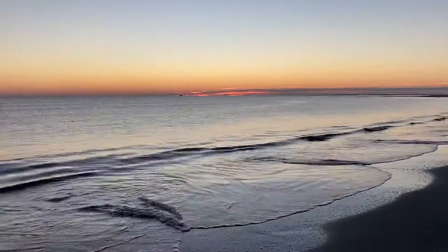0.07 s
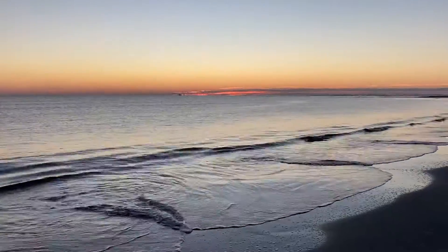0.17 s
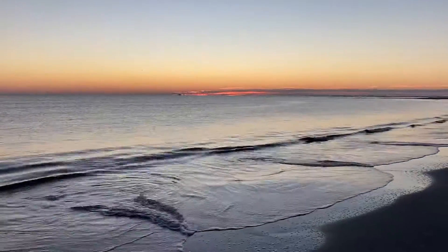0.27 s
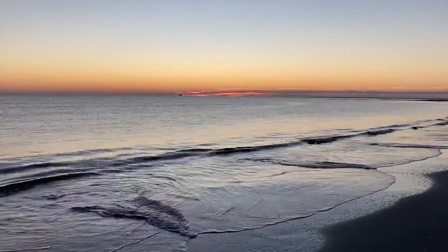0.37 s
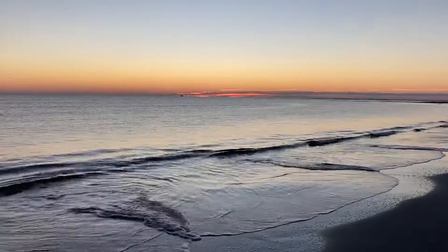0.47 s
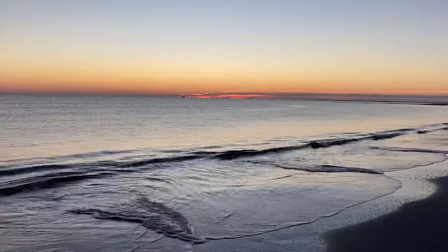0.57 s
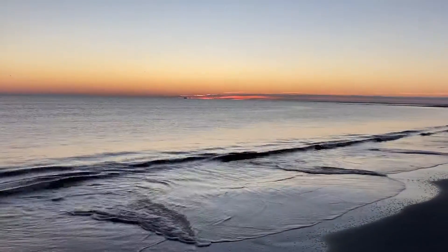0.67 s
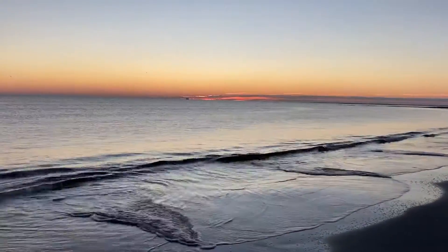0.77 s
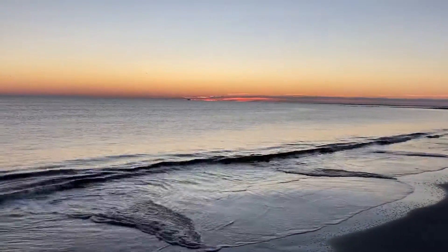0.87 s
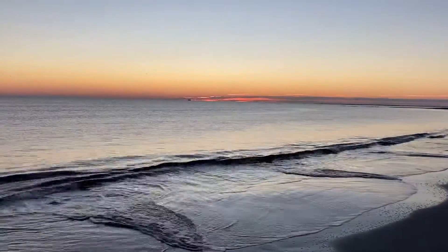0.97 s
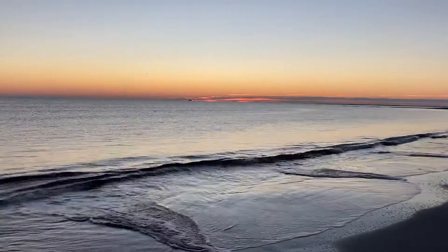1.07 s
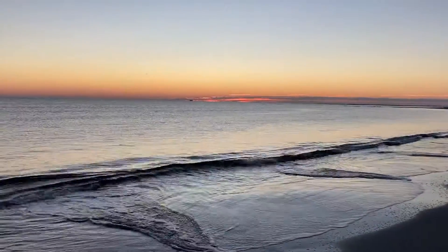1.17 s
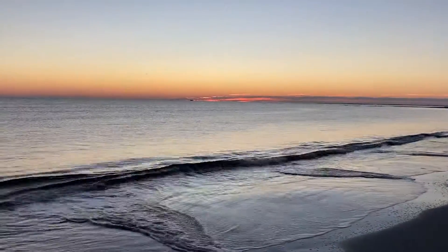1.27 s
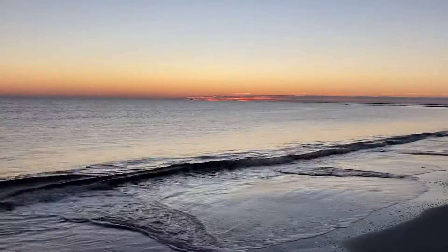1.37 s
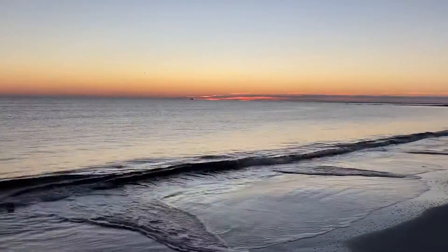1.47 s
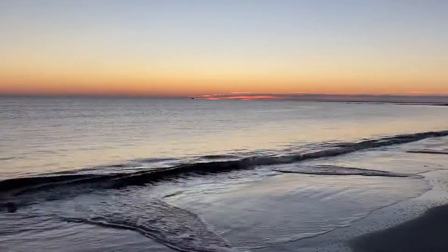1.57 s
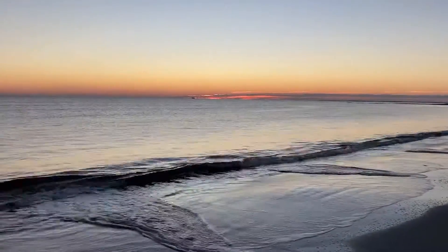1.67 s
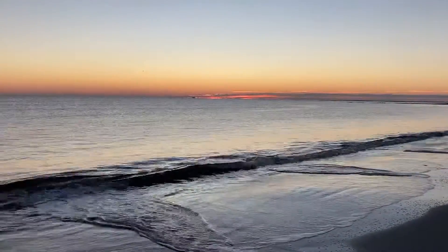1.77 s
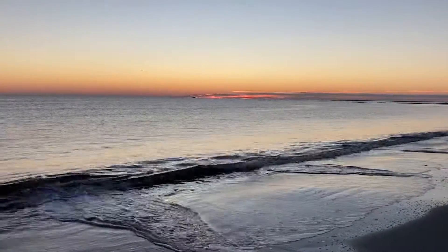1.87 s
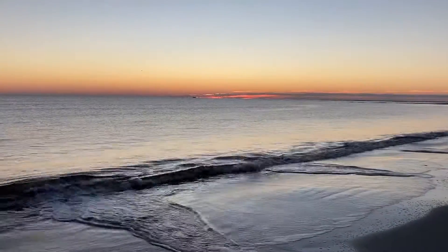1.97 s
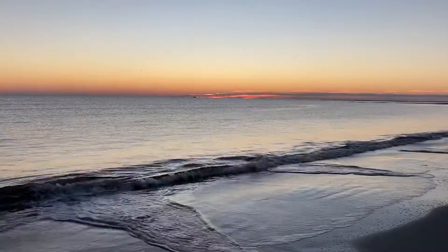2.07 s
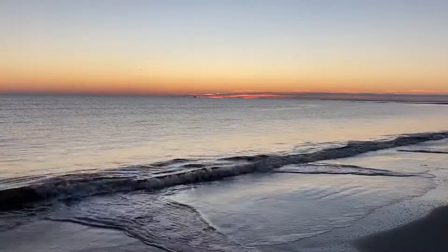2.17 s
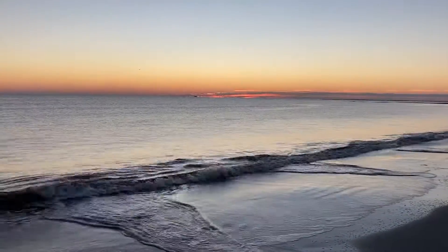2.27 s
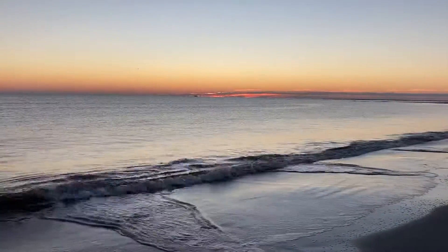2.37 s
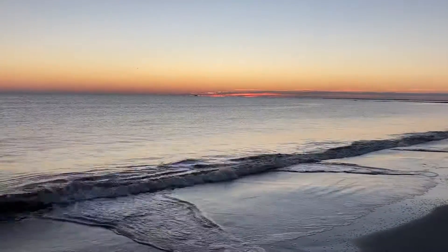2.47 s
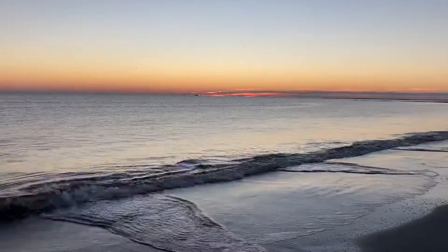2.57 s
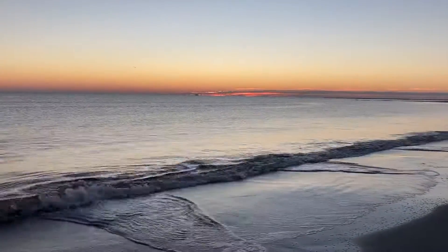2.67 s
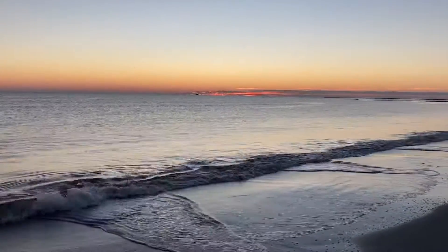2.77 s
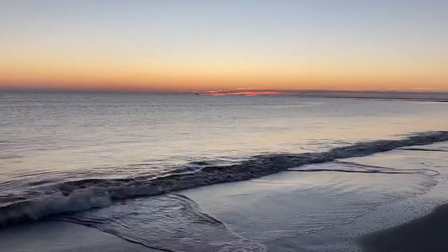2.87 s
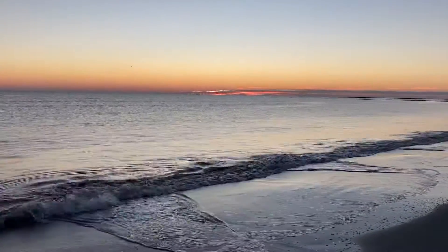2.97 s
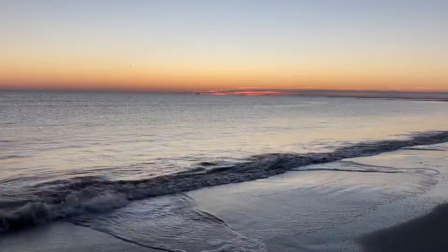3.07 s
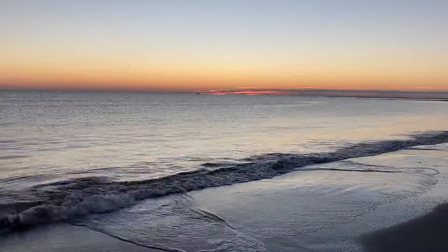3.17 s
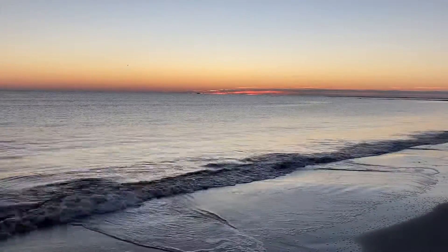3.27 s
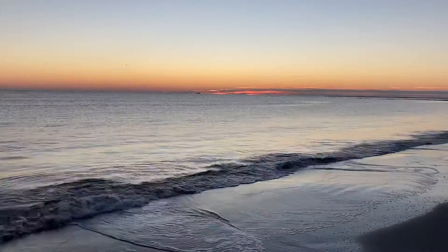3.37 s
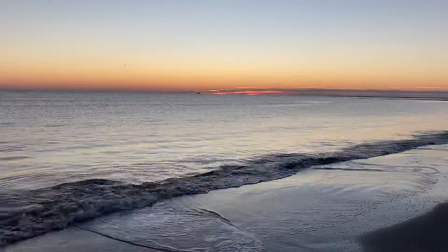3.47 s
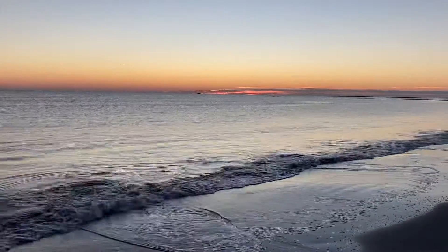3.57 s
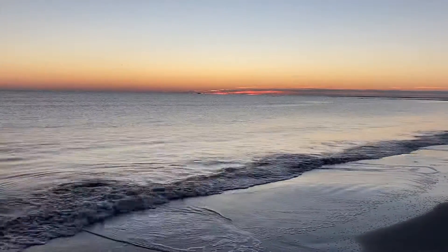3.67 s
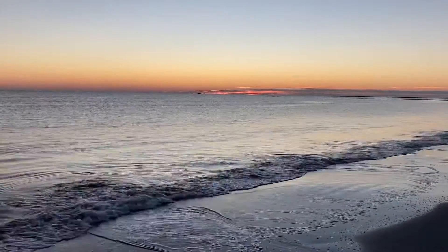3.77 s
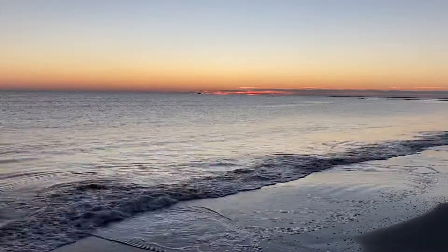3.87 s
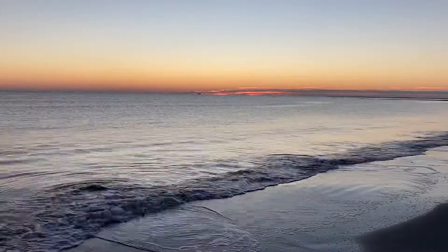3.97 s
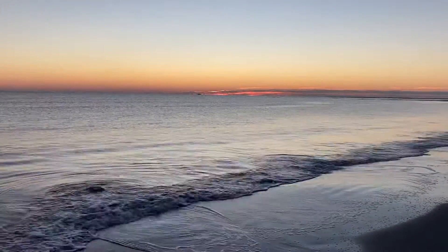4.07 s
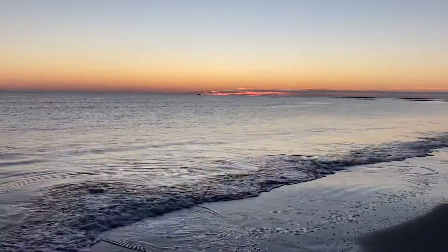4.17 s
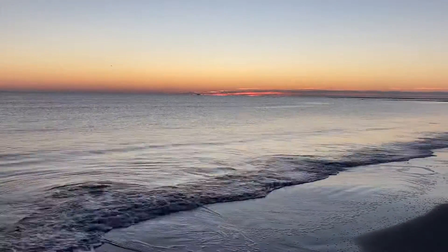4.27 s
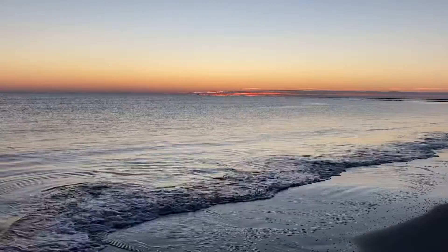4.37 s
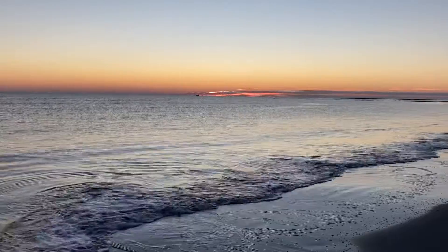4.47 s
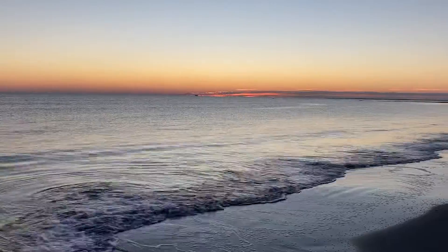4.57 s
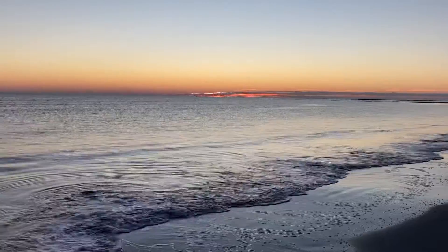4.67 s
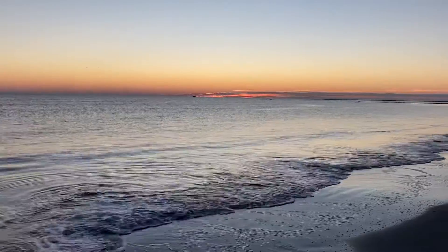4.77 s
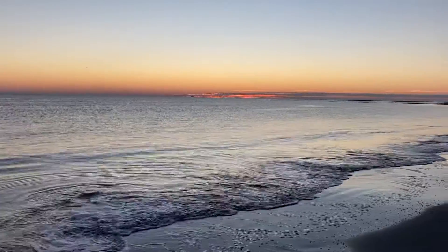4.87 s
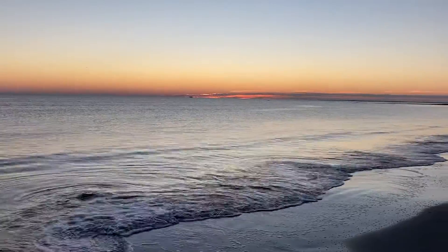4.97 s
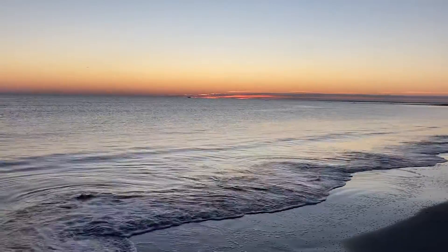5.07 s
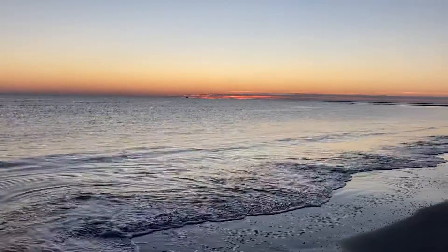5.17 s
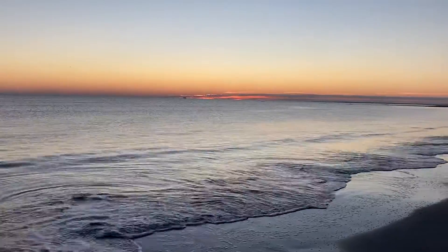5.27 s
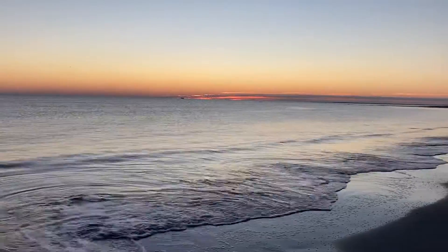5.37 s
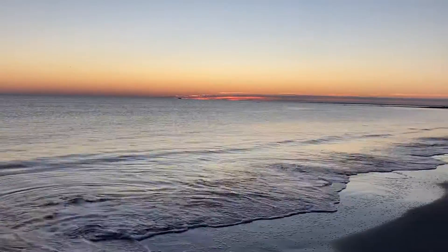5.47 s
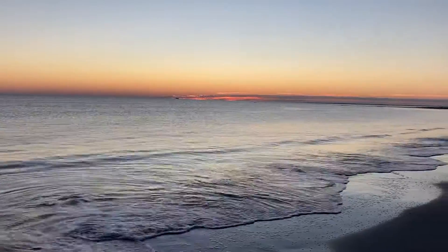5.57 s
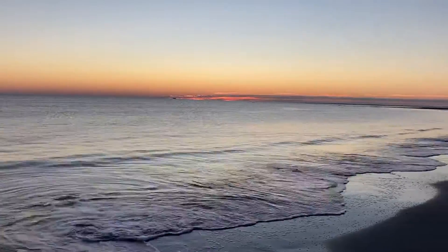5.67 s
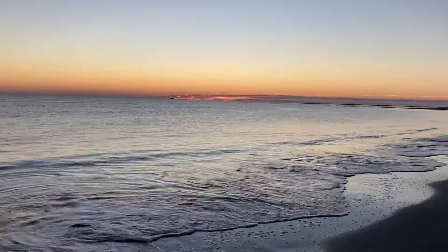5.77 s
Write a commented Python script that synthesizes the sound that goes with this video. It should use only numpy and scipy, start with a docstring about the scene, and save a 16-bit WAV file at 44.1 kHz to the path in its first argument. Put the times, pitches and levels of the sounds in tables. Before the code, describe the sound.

Quiet ripples and distant surf come first, with wind nudging the microphone. A small breaker builds, slapping and gulping as it crosses right to left, bursts into splashy wash, then sinks into fine bubbling fizz on sand. Wind flutters grow strongest around five seconds, followed by a brief faint shorebird twitter at left. Dry outdoor space, no echo.

```python
"""A small wave breaks along a sandy beach, right to left, and runs up the sand as fizzing foam.
Water is shaped noise plus clouds of damped bubble tones; trapped air gulps as rising tones, foam spits.
Wind buffets the two microphone ports as low noise and single pressure swings.
A fuzzy low hum, a thin hiss and far surf lie underneath as a modulated tone and shaped noise.
Two sharp ticks (snap and damped tones) sound close by; a distant shorebird's glides twitter near the end."""
import sys
import numpy as np
from scipy import signal
from scipy.fft import rfft, irfft, next_fast_len
from scipy.io import wavfile
from scipy.ndimage import uniform_filter1d, map_coordinates

SR = 44100
rng = np.random.default_rng(int(sys.argv[2]) if len(sys.argv) > 2 else 0)


def log_audio(samples):
    """Write samples as a 16-bit WAV file to the path given in sys.argv[1]."""
    # one column per channel
    frames = np.atleast_2d(samples).T
    # limit to full scale, then quantise
    limited = np.clip(frames, -1, 1)
    pcm = np.round(limited * 32767).astype(np.int16)
    wavfile.write(sys.argv[1], SR, pcm)


N = 257191  # samples

TOP_HZ = 15800  # band limit
BREAK_S, COLLAPSE_S = 2.526, 2.896  # whole crest breaking between these times

# All spectra give relative gain; the level is set where they are used.
# steady high hiss: freq_hz, gain_db
HISS_SPECTRUM = [(4000, -19), (6000, -3), (7500, -9), (11500, -2.5), (13000, -5), (15500, -8)]
# low drone, relative level: time_s, level_db
HUM_LEVEL = [(0, -46.5), (3, -45), (4, -48), (5.2, -47.5), (5.83, -48.5)]
# surf far along the beach: freq_hz, gain_db
FAR_SURF_SPECTRUM = [(60, -7), (160, -3), (220, 11), (320, 6.5), (480, 7), (660, -9), (1400, -12),
                     (2300, -16), (3500, -11), (6000, -44), (10000, -51), (15500, -36)]
# wind rumble: freq_hz, gain_db
RUMBLE_SPECTRUM = [(15, -17), (30, -14), (45, -3.5), (62, 1.5), (100, -1.5), (160, -6.5), (250, -13),
                   (500, -22), (1200, -91)]
# gusts over the breeze, relative level: middle_s, length_s, level_db
GUSTS = [(1.302, 0.74, -49), (2.393, 1.04, -42), (2.998, 0.15, -40), (4.2, 0.85, -60), (5.827, 0.14, -46)]
# single eddies hitting the ports: middle_s, peak_db, swing_hz, length_s
EDDIES = [(0.243, -30.5, 55, .044), (.77, -37.5, 70, .04), (1.145, -35, 80, .06), (1.428, -27.5, 120, .04),
          (1.535, -34.5, 68, .05), (2.161, -30, 82, .048), (2.485, -27, 65, .06), (3.169, -28, 90, .04),
          (3.441, -31, 70, .048), (3.55, -36, 55, .05), (3.96, -35, 50, .048), (4.185, -31, 190, .014),
          (4.29, -38, 50, .05), (4.44, -38, 50, .05), (4.468, -35, 140, .03), (4.635, -30.5, 120, .035),
          (4.669, -28, 55, .048), (4.727, -30.5, 105, .045), (4.756, -30, 75, .045), (4.832, -33, 100, .04),
          (4.868, -33.5, 58, .05), (4.912, -31.5, 52, .055), (4.979, -24, 52, .042), (5.064, -24, 65, .036),
          (5.09, -23.5, 92, .036), (5.361, -37, 102, .048), (5.42, -36, 95, .04), (5.452, -29.5, 135, .035),
          (5.48, -30, 66, .048), (5.62, -38, 70, .05), (5.728, -29, 80, .036), (5.8, -34, 65, .07)]
# turbulence stirred by eddies: freq_hz, gain_db
TURBULENCE_SPECTRUM = [(40, -20), (90, 3), (150, 5), (260, -14.5), (400, -24), (900, -60)]
# bird syllables, four low, then fainter high ones between and after: start_s, length_s, pitch_hz,
# glide_hz_per_s, level_db
BIRD_SYLLABLES = [(5.226, .036, 2585, 2200, -45), (5.27, .025, 2625, -500, -43.5),
                  (5.302, .027, 2635, -2000, -44), (5.341, .02, 2580, -4500, -44.5),
                  (5.258, .02, 3660, -6000, -58), (5.297, .012, 3540, -2000, -55),
                  (5.333, .012, 3450, -6000, -54), (5.364, .026, 3400, 1500, -55),
                  (5.384, .03, 3450, -6000, -59)]
# sharp ticks: start_s, snap_db, body_db
TICKS = [(.8368, -32.5, -50), (4.3517, -43, -21)]
# damped tones of a tick body: freq_hz, level_db, t60_s
TICK_MODES = [(800, -.5, .006), (2300, 4, .0033), (4400, 0, .003), (8400, 1, .0035)]

# where the water is loudest: time_s, left_share (0-1 of power)
SWEEP = [(0, 0.02), (.9, 0), (1.3, 0.14), (2.2, 0.96), (3.2, 0.99), (4.2, 0.61), (5.8, 1)]
# sound bending round to the ports from the left: freq_hz, left_lead_rad, left_louder_db
FROM_LEFT = [(100, .1, -2), (202, 0.1, -1.5), (374, 1.22, -0.5), (700, 1.62, 4), (1246, 1.93, 5),
             (1380, 3.76, 0), (1830, 4.32, 0.5), (2310, 5.8, 0.5), (2750, 6.8, 4), (3750, 10.2, -1),
             (4580, 12.2, -2), (6200, 15.2, -4.5)]
# the same from the right: freq_hz, left_lead_rad, left_louder_db
FROM_RIGHT = [(100, 0.5, 9), (290, 0.15, -4.5), (550, 0.5, -1), (1090, -1, -0.5), (1510, 1.1, 0),
              (1780, -2.5, 2), (2600, 5.5, 2), (4500, 3, -20), (5970, -6, -2)]
# left-right phase turn that widens the treble: freq_hz, left_lead_rad
TREBLE_PHASE_TURN = [(5200, 3.1), (7200, 0), (9100, -3.1), (11300, -6.3), (13700, -9.4), (15600, -12.6)]
# colour of the right stretch against the left: freq_hz, gain_db
RIGHT_STRETCH_COLOUR = [(100, -15), (200, 6.5), (330, 2.5), (480, 4), (750, 0), (1030, 5), (1300, 1),
                        (1550, 8), (2150, 2), (2600, -40), (3600, -42), (4600, -15), (6000, -1.5)]
# breaking crest: freq_hz, gain_db
ROAR_SPECTRUM = [(50, -26), (100, 0), (160, 1), (280, -2), (430, -1.5), (620, 3), (820, -4), (1050, -18),
                 (1500, -15), (3000, -21), (6000, -67)]
# white water on the sand: freq_hz, gain_db
WASH_SPECTRUM = [(300, -10), (700, 1.5), (1080, 4), (1380, 0.5), (1650, 1), (2200, 0.5), (2700, -3.5),
                 (3400, -6.5), (4500, -16), (6000, -9), (10000, -49)]
# foam fizz: freq_hz, gain_db
FIZZ_SPECTRUM = [(2000, 11.5), (3500, 8.5), (5000, 8), (6200, -2.5), (7500, -2.5), (9000, -9), (11000, -4),
                 (12500, -9.5), (15500, -14.5)]
# thin sheet of water: freq_hz, gain_db
RUSTLE_SPECTRUM = [(2000, -17), (3500, 5.5), (4700, 15), (6000, 8), (7500, 10), (12000, -107)]
# falling spray: freq_hz, gain_db
SPRAY_SPECTRUM = [(1200, -13), (2200, 3.5), (2800, 0.5), (3500, 0.5), (4500, -4.5), (5600, -11.5),
                  (7500, -40), (12000, -117)]
# deep plunge: freq_hz, gain_db
DEEP_SPECTRUM = [(50, -39), (110, -4.5), (170, -2.5), (290, 1.5), (430, -3), (620, -6.5), (900, -8.5),
                 (2000, -68)]
# foam left on the sand: freq_hz, gain_db
LATHER_SPECTRUM = [(1000, -16), (1600, 4), (2400, 4), (2800, -1), (3400, -10)]
# stretches of crest tumbling on their own, relative levels: middle_s, length_s, roar_db, wash_db, spray_db
TUMBLES = [(0.548, 0.31, -63, -47.5, -72), (1.18, 0.4, -56, -45.5, -56), (1.504, 0.71, -49, -42, -66),
           (1.784, 0.43, -36.5, -48, -44.5), (2.084, 0.52, -40, -39.5, -45), (2.33, 0.13, -41, -43, -55),
           (2.64, 0.2, -32.5, -41, -55), (3.003, 0.23, -35, -40.5, -32.5), (3.214, 0.34, -37.5, -47, -42),
           (5.424, 0.21, -53.5, -74, -62), (5.8, 0.62, -56.5, -64.5, -68)]
# ripples over wet sand close by, relative level: middle_s, length_s, level_db
RIPPLES = [(0.59, 0.33, -54.5), (0.845, 0.19, -54.5), (2.081, 0.053, -44)]
# masses of water dropping in the plunge, relative level: middle_s, length_s, level_db
DUMPS = [(1.78, 0.23, -43), (2.034, 0.1, -38), (2.16, 0.079, -35), (2.282, 0.1, -38), (2.4, 0.11, -34),
         (2.473, 0.089, -30.5), (2.594, 0.05, -30.5), (2.994, 0.06, -36), (3.223, 0.073, -38)]
# slaps of the curling crest: start_s, relative level_db, splash_db (against the thud)
SLAPS = [(0.519, -26, -7), (0.555, -28.5, -12), (1.05, -38, -8), (1.12, -29.5, -7), (1.231, -23, -16),
         (1.407, -24, -5), (1.579, -24, -8), (2.068, -20, -4), (2.128, -30, -12), (2.462, -36, -16),
         (2.612, -22, -4.5), (2.738, -16.5, -13), (2.82, -33, 10), (3.169, -20, -12)]
# air pockets shut in by the crest: start_s, peak_db, pitch_hz, left_lead_ms
GULPS = [(1.406, -28, 430, .1), (2.076, -20, 850, .43), (2.395, -25, 560, .5), (2.462, -24, 290, .1),
         (2.61, -26, 560, .2), (2.829, -26, 1050, .4), (2.94, -26, 330, .1), (3.168, -28, 680, .25)]
# spits of spray: middle_s, level_db, splash_db (lower splash against the fizz)
SPITS = [(.033, -57, 12), (.472, -51, 1), (.642, -48, 6), (1.063, -56, 15), (1.192, -47, 0),
         (1.832, -45, -6), (2.615, -38, 5)]


def amp(db):
    """Decibels to gain."""
    return 10 ** (np.asarray(db) / 20)


def unit(x):
    """Scale to rms 1."""
    return x / np.sqrt(np.mean(x ** 2) + 1e-20)


def along(points, hz):
    """Read (freq_hz, value) points on a log axis."""
    freq_hz, value = np.transpose(points)
    return np.interp(np.log(hz + 1), np.log(freq_hz + 1), value)


def curves(rows):
    """Interpolate each column after the time, one value per sample."""
    time_s, *columns = np.transpose(rows)
    return [np.interp(np.arange(N) / SR, time_s, column) for column in columns]


def wobble(rate_hz):
    """Smooth random curve with rate_hz knots a second."""
    knots = rng.standard_normal(int(N * rate_hz / SR) + 4)
    return map_coordinates(knots, [np.arange(N) * rate_hz / SR])


def filtered(x, response):
    """Multiply the spectrum of x by a complex response of frequency."""
    size = next_fast_len(N + SR // 4, True)
    return irfft(rfft(x, size) * response(np.fft.rfftfreq(size, 1 / SR)), size)[..., :N]


def coloured(x, spectrum):
    """Filter x by a gain table, then scale to rms 1."""
    return unit(filtered(x, lambda hz: amp(along(spectrum, hz))))


def from_side(x, lead_ms, pan_db):
    """Mono to stereo: the left port hears it earlier and louder by these amounts."""
    half = np.array([[.5], [-.5]])
    return filtered(x, lambda hz: amp(half * pan_db) * np.exp(2j * np.pi * hz * half * lead_ms / 1000))


def arriving(x, direction):
    """Mono to stereo by the phase and level differences of one direction."""
    freq_hz, lead_rad, pan_db = np.transpose(direction)

    def log_ratio(hz):
        phase = along(np.c_[freq_hz, lead_rad], hz)
        gain = amp(along(np.c_[freq_hz, pan_db], hz))
        return 1j * phase + np.log(gain)

    return filtered(x, lambda hz: np.exp(np.outer([.5, -.5], log_ratio(hz))))


def widened(x):
    """Spread mono treble over left and right by turning its phase with frequency."""
    return filtered(x, lambda hz: np.exp(.5j * np.outer([1, -1], along(TREBLE_PHASE_TURN, hz))))


def add(track, start_s, sound):
    """Mix a short sound into a track."""
    part = track[..., max(round(start_s * SR), 0):][..., :sound.shape[-1]]
    part += sound[..., :part.shape[-1]]


def swell(peak_db, rise_db_per_s, fall_db_per_s, start_s=BREAK_S, end_s=COLLAPSE_S):
    """Level in dB that rises until start_s, holds until end_s, then falls."""
    t = np.arange(N) / SR
    return peak_db - rise_db_per_s * np.maximum(start_s - t, 0) - fall_db_per_s * np.maximum(t - end_s, 0)


def surge(middle_s, length_s, level_db):
    """Level in dB of a rounded burst, 10 dB down at both ends of its length."""
    return level_db - 10 * (2 * (np.arange(N) / SR - middle_s) / length_s) ** 2


def together(*levels_db):
    """Level in dB of unrelated sounds: their powers add."""
    return 10 * np.log10(sum(amp(db) ** 2 for db in levels_db) + 1e-20)


def bubbles(centre_hz, spread, cycles, scatter_db, count):
    """Cloud of damped bubble tones at rms 1, each rising in pitch as it nears the surface."""
    when, size = rng.random((2, count))
    hz = np.clip(centre_hz * np.exp(spread * rng.standard_normal((count, 1))), 100, TOP_HZ)
    t = np.arange(384) / SR
    age = hz * t / cycles
    strength = amp(-scatter_db * np.log(1 - .995 * size))[:, None]
    decay = np.exp(-3 * age) * (1 - t / t[-1])
    rise = 1 + 0.053 * np.minimum(age, 2)
    tones = strength * decay * np.sin(2 * np.pi * hz * t * rise)
    index = (when * N).astype(int)[:, None] + np.arange(len(t))
    return unit(np.bincount(index.ravel(), tones.ravel(), N)[:N])


def churn(patchy_db, channels):
    """Independent noises at rms 1 with bounded random gain in small time-frequency patches."""
    z = signal.stft(rng.standard_normal((channels, N)), nperseg=512)[2]
    field = uniform_filter1d(rng.standard_normal(z.shape), size=3, axis=1)
    field = uniform_filter1d(field, size=7, axis=2)
    return unit(signal.istft(z * amp(patchy_db * np.tanh(unit(field))), nperseg=512)[1][:, :N])


def shoreline(water, spectrum, spread_db):
    """Four streams of water: right stretch, left stretch and a diffuse pair from the whole beach."""
    left_share = np.clip(curves(SWEEP)[0], 0, 1)
    right_water = coloured(water[0], RIGHT_STRETCH_COLOUR) * np.sqrt(1 - left_share) * amp(-4.5)
    right = arriving(right_water, FROM_RIGHT)
    left = arriving(water[1] * np.sqrt(left_share), FROM_LEFT)
    # diffuse part is stronger in the bass
    diffuse = filtered(water[2:], lambda hz: amp(spread_db + along([(150, 10.5), (900, -1)], hz)))
    return coloured(right + left + diffuse, spectrum)


def hiss():
    """Thin, even high noise that is left when the water is calm."""
    return amp(-60) * widened(coloured(rng.standard_normal(N), HISS_SPECTRUM))


def hum():
    """Faint drone, perhaps a boat far out: a tone widened by random parts in and out of step."""
    pitch_hz = 117.9
    phase = 2 * np.pi * pitch_hz * np.arange(N) / SR
    in_step = (.75 + .55 * wobble(36)) * np.sin(phase)
    out_of_step = .85 * wobble(36) * np.cos(phase)
    drone = in_step + out_of_step
    return from_side(amp(curves(HUM_LEVEL)[0] - 1.5) * drone, lead_ms=0, pan_db=-9.0)


def far_surf():
    """Steady murmur of the rest of the beach: patchy noise, mostly independent between ports."""
    water = churn(patchy_db=3.5, channels=3)
    return amp(-55.5) * coloured(water[0] + 1.8 * water[1:], FAR_SURF_SPECTRUM)


def wind():
    """Restless low rumble; each eddy swings the port pressure a few times and stirs turbulence."""
    breeze_db, trim_db, turbulence_db = -51.5, 4.5, -17  # turbulence against its eddy
    shared, left, right = rng.standard_normal((3, N))
    air = shared + amp(-4) * np.array([left, right])
    flutter_db = 1.7 * wobble(14)
    level_db = together(breeze_db, *[surge(*gust) for gust in GUSTS])
    out = amp(level_db + trim_db + flutter_db) * coloured(air, RUMBLE_SPECTRUM)
    stir = np.zeros(N)
    for middle_s, peak_db, swing_hz, length_s in EDDIES:
        window = np.hanning(round(length_s * SR))
        bend, start, skew = rng.standard_normal(3)
        pitch_hz = swing_hz * np.exp(0.45 * bend * np.linspace(-1, 1, len(window)))
        port_skew = 0.3 * skew * np.array([[1], [-1]])
        phase = 2 * np.pi * (np.cumsum(pitch_hz) / SR + start) + port_skew
        add(out, middle_s - length_s / 2, amp(peak_db) * window * np.sin(phase))
        add(stir, middle_s - length_s / 2, amp(peak_db + turbulence_db) * window)
    return out + stir * coloured(rng.standard_normal(N), TURBULENCE_SPECTRUM)


def bird():
    """Gliding whistles on two pitches from the left, with slight rasp and faint scatter off the water."""
    out, rasp = np.zeros(N), wobble(350)
    for start_s, length_s, pitch_hz, glide_hz_per_s, level_db in BIRD_SYLLABLES:
        t = np.arange(max(round(length_s * SR), 2)) / SR
        arch = np.sqrt(np.abs(np.sin(np.pi * t / t[-1]))) * signal.windows.tukey(len(t))
        track_hz = pitch_hz + glide_hz_per_s * t + 20 * rasp[round(start_s * SR):][:len(t)]
        add(out, start_s, amp(level_db) * arch * np.sin(2 * np.pi * np.cumsum(track_hz) / SR))
    t = np.arange(SR // 6) / SR
    tail = rng.standard_normal((2, len(t))) * amp(-60 * t / .2)  # t60 0.2 s
    scatter = signal.fftconvolve(out[None], tail / np.linalg.norm(tail[0]), axes=1)[:, :N]
    return from_side(out, lead_ms=.34, pan_db=6) + amp(-16) * scatter


def ticks():
    """Short dry ticks, like drops landing close by: a noise snap over quickly damped tones."""
    attack_s, snap_t60_s = .0003, .016
    snaps, bodies, t = np.zeros(N), np.zeros(N), np.arange(SR // 50) / SR
    snap_spectrum = [(3000, -6), (5000, -9), (8500, -4), (10500, 5), (14000, -10)]
    crack = coloured(rng.standard_normal(N), snap_spectrum)
    rise = 1 - np.exp(-t / attack_s)
    modes = [amp(db - 60 * t / t60_s) * np.sin(2 * np.pi * hz * t) for hz, db, t60_s in TICK_MODES]
    body = rise * sum(modes)
    for start_s, snap_db, body_db in TICKS:
        add(snaps, start_s, rise * amp(snap_db - 60 * t / snap_t60_s))
        add(bodies, start_s, amp(body_db) * body)
    thinned = filtered(bodies, lambda hz: amp(along([(250, -24), (650, 0)], hz)))
    return widened(snaps * crack) + thinned


def lather():
    """Small bubbles of similar size linger and pop where the wave runs out on the sand."""
    shared, left, right = [bubbles(2380, spread=0.19, cycles=12, scatter_db=3.0, count=7000)
                           for _ in range(3)]
    pops = coloured(shared + amp(-4) * np.array([left, right]), LATHER_SPECTRUM)
    return amp(surge(middle_s=4.25, length_s=1.4, level_db=-51.5)) * pops


def spits():
    """A handful of drops lands at once: short bright fizz over a lower splash."""
    length_s = .04
    high, low = np.zeros((2, N))
    shape = np.hanning(round(length_s * SR))
    for middle_s, level_db, splash_db in SPITS:
        add(high, middle_s - length_s / 2, amp(level_db) * shape)
        add(low, middle_s - length_s / 2, amp(level_db + splash_db) * shape)
    fizz_spectrum = [(2000, -17), (4500, 0), (8000, -2), (11500, -1), (15500, -16)]
    drop_spectrum = [(700, -16), (1500, 10), (2500, -1), (4000, -25)]
    fizz = coloured(rng.standard_normal(N), fizz_spectrum)
    drops = coloured(rng.standard_normal(N), drop_spectrum)
    return widened(high * fizz) + from_side(low * drops, lead_ms=0.12, pan_db=-3)


def gulps():
    """Each air pocket rings briefly with rough phase, rising in pitch as it floats up."""
    attack_s, t60_s, rise_per_s = .003, .06, 3
    out, t = np.zeros((2, N)), np.arange(SR // 10) / SR
    shape = (1 - np.exp(-t / attack_s)) * amp(-60 * t / t60_s)
    rough_rad = wobble(330)
    for start_s, peak_db, pitch_hz, lead_ms in GULPS:
        heard_s = t + np.array([[.5], [-.5]]) * lead_ms / 1000
        phase = 2 * np.pi * pitch_hz * heard_s * (1 + rise_per_s * t / 2)
        phase = phase + rough_rad[round(start_s * SR):][:len(t)]
        add(out, start_s, amp(peak_db) * shape / shape.max() * np.sin(phase))
    return out


def slaps():
    """The curling lip hits the water: a dull noise thud with a splash."""
    attack_s, t60_s, trim_db = 0.0017, 0.069, -5.5
    out, t = np.zeros(N), np.arange(SR // 6) / SR
    thud = coloured(rng.standard_normal(N), ROAR_SPECTRUM)
    splash_noise = coloured(rng.standard_normal(N), WASH_SPECTRUM)
    for start_s, level_db, splash_db in SLAPS:
        burst = (thud + amp(splash_db) * splash_noise)[round(start_s * SR):][:len(t)]
        shape = amp(level_db + trim_db - 60 * t / t60_s) * (1 - np.exp(-t / attack_s))
        add(out, start_s, shape * burst)
    return from_side(out, lead_ms=0.11, pan_db=0.5)


def splash(level_db):
    """Drops from the collapsing crest rain back on the water: patchy noise and bubble tones."""
    drops = np.array([bubbles(3315, spread=0.333, cycles=10.5, scatter_db=0.0, count=4000)
                      for _ in range(4)])
    water = churn(patchy_db=8.0, channels=4) + amp(-15) * drops
    return amp(level_db + 0.59 * wobble(30.24)) * shoreline(water, SPRAY_SPECTRUM, spread_db=4.0)


def foam(level_db, sheet_db):
    """Tiny bubbles burst on the foam and on the thin sheet of water ahead of it."""
    bursts = bubbles(8100, spread=0.18, cycles=1.3, scatter_db=9.0, count=6000)
    shared = widened(churn(patchy_db=3.5, channels=1)[0] + amp(-21) * bursts)
    # low fizz is diffuse; the top is mostly one shared noise, widened by phase
    diffuse = filtered(churn(patchy_db=2, channels=2), lambda hz: amp(along([(5500, 0), (7500, -4)], hz)))
    top = filtered(shared, lambda hz: amp(along([(5000, -6.0), (7000, 14.5)], hz)))
    fizz = amp(level_db + 2.5 + 0.58 * wobble(35)) * coloured(top + diffuse, FIZZ_SPECTRUM)
    crackle = np.array([bubbles(4330, spread=0.21, cycles=4.9, scatter_db=3.5, count=7000)
                        for _ in range(2)])
    return fizz + amp(sheet_db + 3.3 * wobble(34.3)) * coloured(crackle, RUSTLE_SPECTRUM)


def wash(level_db):
    """White water tumbles up the sand: short splashy crackles and longer ringing bubbles."""
    froth = np.array([bubbles(1829, spread=0.466, cycles=58, scatter_db=3.0, count=4000)
                      for _ in range(4)])
    crackle = np.array([bubbles(1610, spread=0.44, cycles=2.4, scatter_db=2.5, count=3000)
                        for _ in range(4)])
    water = churn(patchy_db=10.5, channels=4) + amp(-8) * froth + amp(-13.0) * crackle
    return amp(level_db + 4.0 + 0.87 * wobble(30.1)) * shoreline(water, WASH_SPECTRUM, spread_db=-1.0)


def plunge(level_db):
    """The body of the wave drops into the trough: deep rumbling noise."""
    water = churn(patchy_db=-1.5, channels=4)
    return amp(level_db + 0.5 + 0.46 * wobble(26)) * shoreline(water, DEEP_SPECTRUM, spread_db=-15.0)


def roar(level_db):
    """The crest plunges and traps large air pockets: noise with low bubble tones."""
    pockets = np.array([bubbles(508, spread=0.39, cycles=4.8, scatter_db=3.0, count=3000)
                        for _ in range(4)])
    water = churn(patchy_db=0.0, channels=4) + amp(-18.5) * pockets
    return amp(level_db + 0.5 + 0.46 * wobble(25.15)) * shoreline(water, ROAR_SPECTRUM, spread_db=-17.0)


def wave():
    """The swell builds, holds and collapses; tumbles add roar, wash and spray, ripples rustle and fizz."""
    # relative levels: sources may add their own trim
    roar_swell_db = swell(peak_db=-33, rise_db_per_s=7.1, fall_db_per_s=11.75)
    wash_swell_db = swell(peak_db=-34, rise_db_per_s=7.38, fall_db_per_s=9.5)
    fizz_swell_db = swell(peak_db=-40.5, rise_db_per_s=10.1, fall_db_per_s=10.1)
    sheet_swell_db = swell(peak_db=-50, rise_db_per_s=7.2, fall_db_per_s=26)
    spray_swell_db = swell(peak_db=-37.5, rise_db_per_s=45, fall_db_per_s=9.5)
    plunge_swell_db = swell(peak_db=-32.5, rise_db_per_s=18.3, fall_db_per_s=59, start_s=2.44, end_s=3.2)
    late_drop_db, = curves([(4.2, 0), (4.7, 3)])  # wash swell sinks a further 3 dB
    calm_fizz_db, spray_fizz_db, ripple_fizz_db = -60.5, -7, -1.5  # last two against spray, ripples

    roar_db = together(roar_swell_db, *[surge(s, length_s, db) for s, length_s, db, _, _ in TUMBLES])
    wash_db = together(wash_swell_db - late_drop_db,
                       *[surge(s, length_s, db) for s, length_s, _, db, _ in TUMBLES])
    spray_db = together(spray_swell_db, *[surge(s, length_s, db) for s, length_s, _, _, db in TUMBLES])
    ripples_db = together(*[surge(*ripple) for ripple in RIPPLES])
    fizz_db = together(calm_fizz_db, fizz_swell_db, spray_db + spray_fizz_db, ripples_db + ripple_fizz_db)
    sheet_db = together(sheet_swell_db, ripples_db)
    plunge_db = together(plunge_swell_db, *[surge(*dump) for dump in DUMPS])

    breaker = roar(roar_db) + plunge(plunge_db) + splash(spray_db) + slaps() + gulps() + spits()
    return breaker + wash(wash_db) + foam(fizz_db, sheet_db) + lather()


def scene():
    """The wave, the wind and the small sounds around them."""
    return wave() + far_surf() + hiss() + wind() + hum() + ticks() + bird()


def record(dry):
    """Roll off the deepest bass below 26 Hz and cut everything from the band limit up."""
    return filtered(dry, lambda hz: (hz < TOP_HZ) * hz ** 2 / np.sqrt(hz ** 4 + 26 ** 4))


dry = scene()
out = record(dry)
log_audio(out)
```